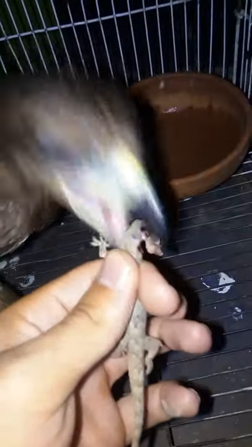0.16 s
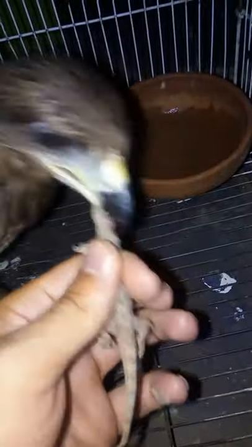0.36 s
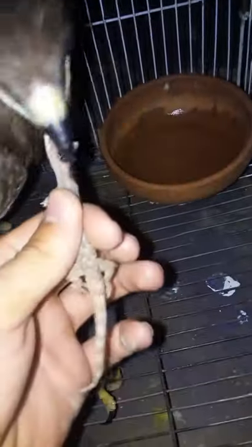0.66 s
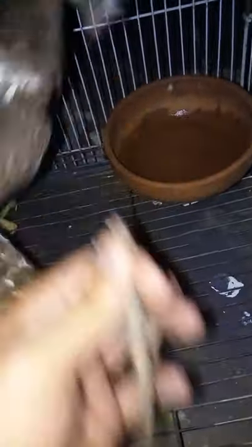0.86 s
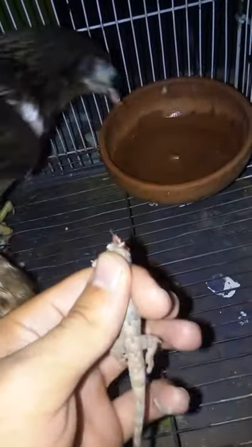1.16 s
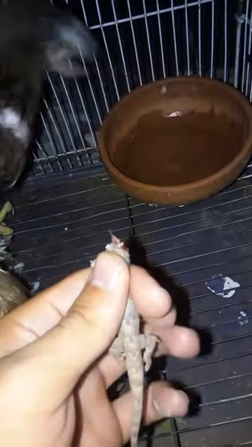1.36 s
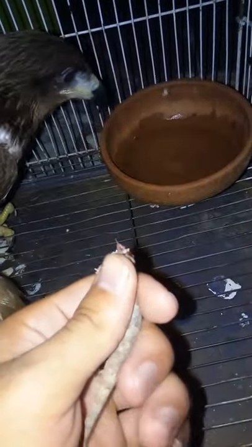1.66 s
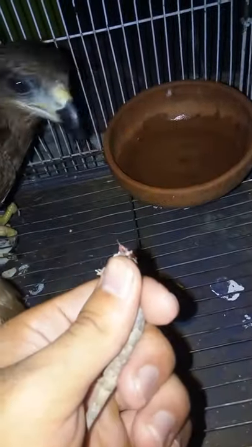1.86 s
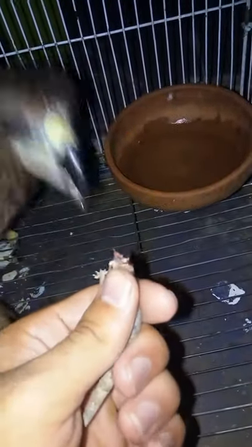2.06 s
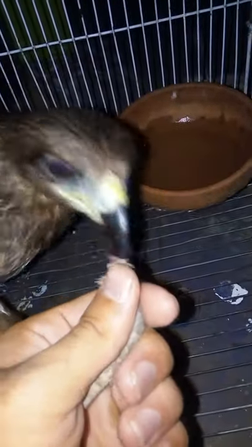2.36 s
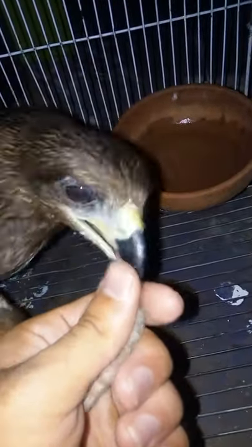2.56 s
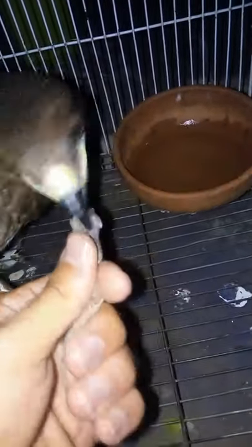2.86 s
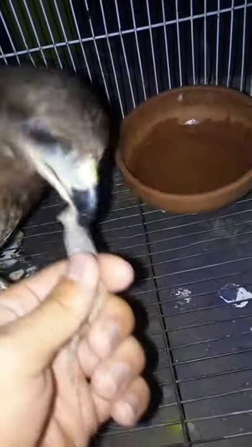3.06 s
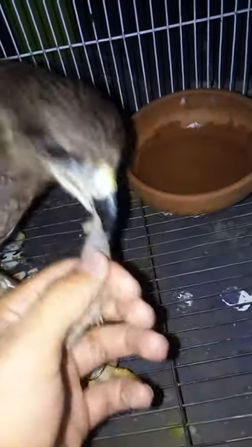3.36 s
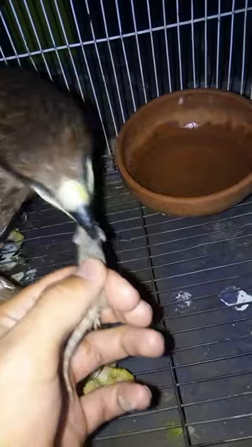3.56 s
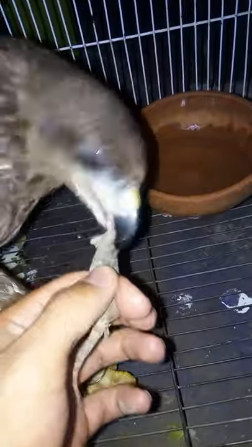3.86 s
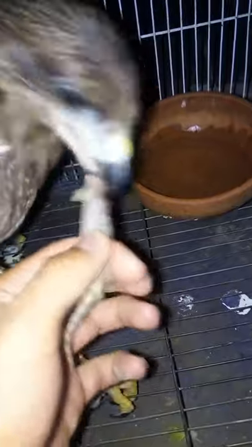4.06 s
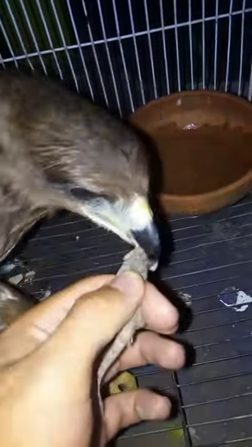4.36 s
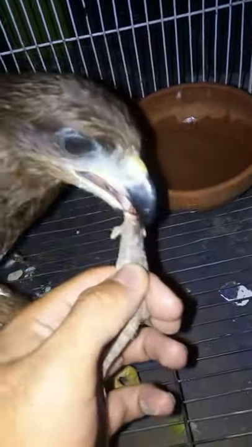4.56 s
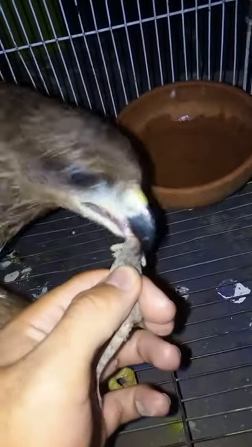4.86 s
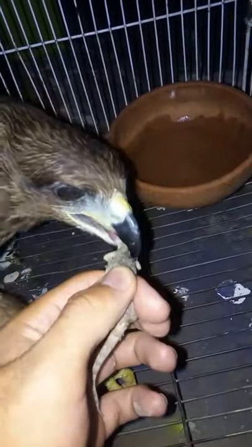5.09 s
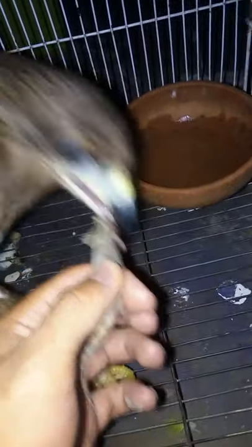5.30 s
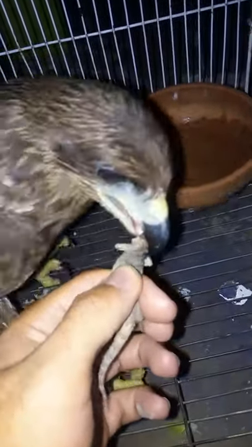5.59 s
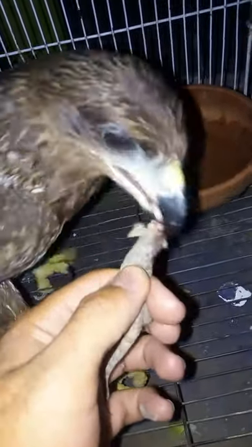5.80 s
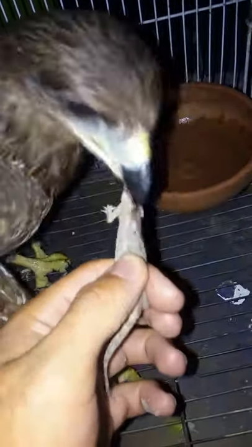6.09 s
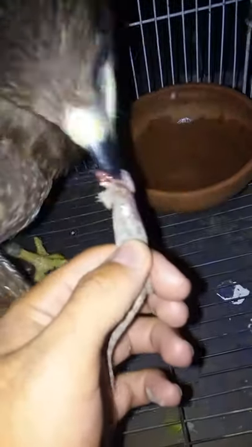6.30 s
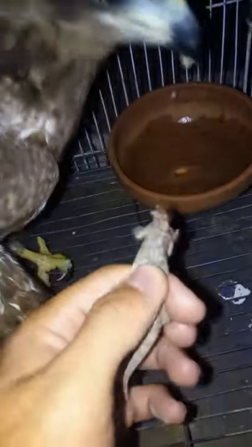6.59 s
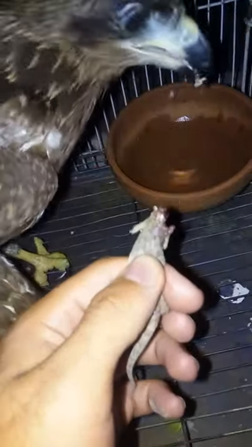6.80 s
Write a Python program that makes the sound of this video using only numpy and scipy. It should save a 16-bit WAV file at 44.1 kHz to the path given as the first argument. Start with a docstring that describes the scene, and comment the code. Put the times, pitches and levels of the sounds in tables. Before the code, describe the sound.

Night in a small hard cage, picked up close in stereo: a distant bass hum swells and sinks beneath steady insect hiss near 7 kHz. A clipped bird chirp is already sounding at 0 s. From 0.2 to 1.5 s, crisp beak and claw ticks cluster with soft grainy feather rustles; faint cricket pips ring at left from 1.0 to 1.8 s. A stronger rustle at 1.9 s meets a weak chirp, tiny quill squeaks and a faint low ring, then a louder, very short chirp at 2.36 s. Ticks continue to 3.2 s; dull tray knocks come at 3.5, 3.8 and 4.0 s. From 4.4 to 5.6 s a loud piercing whistle wavers around 2.1 kHz, jumps higher near 5.35 s and cracks into a rasp. Clearer cricket pips, a rustle and a knock follow; a low shaky cluck at 6.0 s and last ticks until 6.6 s end it.

```python
"""A caged bird of prey, fed by hand at night: two microphone ports hear it close by in a small hard space.
Hum and insect chorus, shaped noise, lie under it all. A chirp of stacked partials opens; noise-burst ticks
of beak and claws and grainy feather rustles follow, a cricket's ringing pips, then two more chirps. Damped
modes knock in the floor tray, one long wavering whistle cracks into a rasp near its end, pips return and a
low shaky cluck and last ticks follow. Gain control ducks the background under loud sounds."""
import sys
import numpy as np
from scipy import signal
from scipy.fft import rfft, irfft
from scipy.io import wavfile
from scipy.ndimage import uniform_filter1d, minimum_filter1d

SR = 44100
rng = np.random.default_rng(int(sys.argv[2]) if len(sys.argv) > 2 else 0)


def bounce(signal):
    """Save signal as a 16-bit WAV file at the path given by the first command-line argument."""
    frames = np.transpose(np.atleast_2d(signal))
    limited = np.clip(frames, -1, 1)
    pcm = np.round(limited * 32767).astype(np.int16)
    wavfile.write(sys.argv[1], SR, pcm)


N = 306054
LEAD_S = 0.035  # the first call is already sounding this long


def gain_of(db):
    """Decibels to amplitude gain."""
    return 10 ** (np.asarray(db) / 20)


def evened(x):
    """Scales a sound to rms 1."""
    return x / np.sqrt(np.mean(x ** 2) + 1e-20)


def read(points, hz):
    """Reads a curve of (f/Hz, value) on a log-frequency axis."""
    f, value = np.transpose(points)
    return np.interp(np.log(hz + 1), np.log(f + 1), value)


def sides(pan_db):
    """Gains of the left and right port for a left minus right level."""
    return gain_of(np.multiply.outer([0.5, -0.5], pan_db))


def wander(length, span):
    """Random drift for two sides, smoothed over span samples, rms 1."""
    return evened(uniform_filter1d(rng.standard_normal((2, length)), span))


def coloured(x, points, tilt_db=0):
    """Shapes both channels by a spectrum tilted in dB per octave about 8 kHz, rms 1."""
    hz = np.fft.rfftfreq(x.shape[1], 1 / SR)
    octaves = np.log2(hz / 8000 + 0.0011)
    shaped = rfft(x) * gain_of(read(points, hz) + tilt_db * octaves)
    return evened(irfft(shaped, x.shape[1]))


def add(mix, s, sound):
    """Mixes a two-channel sound in at time s."""
    part = mix[:, round((s + LEAD_S) * SR):][:, :sound.shape[1]]
    part += sound[:, :part.shape[1]]


def air(points, db, patchy_db, swelling):
    """Far noise: random short-time spectra with drifting patches, likeness of the sides set by frequency."""
    # swell of the low hum: t/s, level/dB
    hum_swell = [(0, 4), (.6, 2.5), (.9, -6), (1.6, 4.5), (2.3, 0), (3, 2.5), (3.6, 0.8), (4.3, -2.5),
                 (5.2, 3), (5.8, 0), (6.4, 6), (6.94, -2)]
    # lift of the background's upper part that offsets the gain control's ducking:
    # t/s, level/dB, half width/s
    background_lift = [(3.6, 2.5, 0.34), (5.5, 10.5, 0.42)]
    # likeness of the two ports: f/Hz, likeness (share)
    likeness = [(60, 1), (180, 0.93), (550, 0.68), (1650, -0.2), (4970, -0.0087), (15000, -0.21)]
    # lean of the far sound: f/Hz, left minus right level/dB
    far_lean = [(60, -1), (180, -3.5), (550, -0.5), (1650, -3.5), (4970, -4.5), (15000, 2.5)]
    upper_share = 0.058  # how much of the swell the upper part follows
    frames, hz = N // 256 + 5, np.fft.rfftfreq(1024, 1 / SR)
    a, b, c, d, patches = rng.standard_normal((frames, 513, 5)).T
    patches = evened(uniform_filter1d(uniform_filter1d(patches, 12, 0), 8, 1))
    t = np.arange(frames) * 256 / SR
    low = 1 / (1 + (hz[:, None] / 200) ** 4)
    swell = (low + (1 - low) * upper_share) * np.interp(t, *np.transpose(hum_swell))
    lift = sum(up * np.maximum(1 - abs(t - at) / width, 0) for at, up, width in background_lift)
    swell = swell + (1 - low) * lift
    same = np.clip(read(likeness, hz), -1, 1)[:, None]
    left = a + 1j * b
    right = same * left + np.sqrt(1 - same ** 2) * (c + 1j * d)
    z = np.array([left, right])
    z *= gain_of(patchy_db * patches + swell * swelling) * sides(read(far_lean, hz))[:, :, None]
    noise = signal.istft(z, nperseg=1024, noverlap=768)[1][:, :N]
    return gain_of(db) * coloured(noise, points)


def hum():
    """A distant low hum: swelling noise with most of its power in the bass."""
    # spectrum: f/Hz, relative level/dB
    hum_spectrum = [(20, -15.5), (50, -40), (72, -13.5), (92, -2), (119, 1), (140, -10.5), (163, -5),
                    (210, -15), (290, -12), (420, -17), (620, -22.5), (1000, -23), (1600, -33.5),
                    (2500, -46.5)]
    return air(hum_spectrum, -28.5, patchy_db=1.79, swelling=True)


def insect_chorus():
    """Hiss and the insect chorus: steady patchy noise with a peak near 7 kHz."""
    # spectrum with the chorus peak: f/Hz, relative level/dB
    hiss_spectrum = [(800, -29.5), (1800, -9), (3800, -16.5), (5900, -16), (6600, -2.5), (7090, 5.5),
                     (7700, -7), (8400, -30), (10300, -17), (12000, -81), (13300, -53), (14800, -16),
                     (15600, -40), (16500, -34)]
    return air(hiss_spectrum, -33, patchy_db=2.0, swelling=False)


def room(x):
    """Sparse random-sign echoes, different at each port; each band dies at its own speed."""
    # decay of the small space: f/Hz, t60/s
    decay = [(1000, .25), (2200, 0.31), (4400, 0.27), (8000, 0.28), (16000, 0.038)]
    taps = np.zeros((2, SR // 2))
    at = np.arange(200, SR // 2 - 20, 20) + rng.integers(0, 20, (2, (SR // 2 - 201) // 20))
    np.put_along_axis(taps, at, rng.choice([-1., 1.], at.shape), 1)
    hz, t, z = signal.stft(taps, SR, nperseg=256)
    fading = gain_of(-60 * t / np.abs(read(decay, hz))[:, None])
    tail = signal.istft(z * fading, SR, nperseg=256)[1]
    return signal.fftconvolve(x, tail / np.linalg.norm(tail[0]), axes=1)[:, :x.shape[1]]


def pip(s, db):
    """One wing stroke rings the cricket's harp, a damped tone to the left."""
    pip_hz, t60, pan_db = 3776, 0.037, 10
    t = np.arange(1500) / SR
    ring = np.sin(2 * np.pi * pip_hz * t) * np.minimum(t / 0.0004, gain_of(-60 * t / t60))
    return s, gain_of(db) * np.outer(sides(pan_db), ring)


def knock(s, db, pan_db):
    """A dull blow rings the damped modes of the cage's floor tray."""
    # modes: f/Hz, relative level/dB, t60/s
    tray = [(334, 5, .08), (515, 8, 0.035), (787, 3.5, 0.06), (1160, 5, .025), (1820, 9, 0.012),
            (2400, 4, 0.015)]
    t = np.arange(3000) / SR
    ring = sum(gain_of(level - 60 * t / t60) * np.sin(2 * np.pi * hz * t) for hz, level, t60 in tray)
    return s, gain_of(db) * np.outer(sides(pan_db), ring / abs(ring).max())


def low_tone(s, hz, db, t60):
    """A faint tone of wavering pitch and level that swells quickly and dies slowly."""
    t = np.arange(0, 0.5, 1 / SR)
    turns = np.cumsum(hz * (1 + 0.025 * wander(len(t), 500)[0])) / SR
    fall = gain_of(-60 * t / t60 + 3.5 * wander(len(t), 600)[0])
    tone = np.minimum(t / 0.03, fall) * np.sin(2 * np.pi * turns)
    return s, gain_of(db) * np.array([tone] * 2)


def squeak(s, length, hz, db):
    """Rubbing quills: a short thin tone, stronger on the left."""
    t = np.arange(0, length, 1 / SR)
    return s, gain_of(db) * np.outer(sides(6.), np.sin(2 * np.pi * hz * t) * np.hanning(len(t)))


def rustle(s, t60, db, tilt_db, pan_db):
    """Feather barbs slip in uneven grains of noise that swell and die away."""
    # spectrum of the barbs: f/Hz, relative level/dB
    feather = [(1500, -30), (3500, -2), (6000, 5.5), (10000, 5), (12500, 4.5), (13500, -13), (15000, 15),
               (16500, -19)]
    rise_share, sharp_db = 0.084, -23.5  # rise as a share of the fall; above sharp_db it starts almost at once
    rise = 0.002 + rise_share * t60 / (1 + gain_of(4.7 * (db - sharp_db)))
    t = np.arange(0, rise + t60, 1 / SR)
    grains = gain_of(2.4 * evened(uniform_filter1d(rng.standard_normal(len(t)), 60)))
    shape = np.minimum(t / rise, gain_of(-60 * (t - rise) / t60))
    barbs = coloured(rng.standard_normal((2, len(t))), feather, tilt_db)
    return s, gain_of(db) * sides(pan_db)[:, None] * shape * grains * barbs


def tick(s, db, pan_db, tilt_db):
    """Beak or claw: a crack of a millisecond or two with a short bright ring."""
    # spectrum of the snap: f/Hz, relative level/dB
    snap_spectrum = [(1200, -16), (3000, -9.5), (6000, -1), (10000, 2), (12500, -12), (14500, -6),
                     (16500, -16)]
    ring_hz, spread = 10020, 0.07  # ring and its scatter as a share
    t = np.arange(500) / SR
    snap = coloured(rng.standard_normal((2, 500)), snap_spectrum, tilt_db) * gain_of(-60 * t / 0.015)
    ring = np.sin(2 * np.pi * ring_hz * (1 + spread * rng.standard_normal()) * t)
    ring = ring * gain_of(-60 * t / 0.0032)
    onset = np.minimum(t / 0.00015, 1)
    return s, gain_of(db) * sides(pan_db)[:, None] * (1.09 * snap + 0.7 * ring) * onset


def faint_ticks():
    """Twelve small ticks at random times, as rows of t/s, level/dB, pan/dB, tilt/dB per octave."""
    when, size = rng.random((12, 2)).T
    return [(s * (N / SR - 0.1), -40 + 6 * up, 9, -3) for s, up in zip(when, size)]


def cluck(s, length, first_hz, last_hz, db, tilt_db):
    """A low, short, shaky stack of partials coloured by the throat."""
    # what the throat lets through: f/Hz, level/dB
    throat = [(700, -13), (1400, -6), (2000, -2.5), (2750, -0.5), (3400, -11), (4000, -4), (4700, -17),
              (6000, -17)]
    shake, rough_db = 0.013, 3  # wobble of pitch (share) and of each partial's level
    smear = 0.06  # the throat delays higher partials, radians per squared multiple
    port_lag_s = 0.00022  # arrival at the right port after the left
    t = np.arange(0, length, 1 / SR)
    hz = np.linspace(first_hz, last_hz, len(t)) * (1 + shake * wander(len(t), 150)[0])
    turns = np.cumsum(hz) / SR - np.c_[[0, port_lag_s * first_hz]]
    stack = 0
    for k in range(1, 10):
        level_db = read(throat, k * hz) + tilt_db * np.log2(k) + rough_db * wander(len(t), 200)[0]
        stack = stack + gain_of(level_db) * np.cos(2 * np.pi * k * turns - smear * k ** 2)
    shape = np.sin(np.pi * t / length) ** 2
    return s, gain_of(db) * evened(stack) * sides(3.5)[:, None] * shape


def crack(s, length, db):
    """Chaotic cycles at the whistle's top: a dense burst of noise over the partials."""
    # spectrum of the rasp: f/Hz, relative level/dB
    rasp_spectrum = [(1800, -30), (2600, -4), (3300, 0), (4200, -5), (6000, -10), (8000, -17), (11000, -19),
                     (12000, -40)]
    count = round(length * SR)
    noise = coloured(rng.standard_normal((2, count)), rasp_spectrum)
    return s, gain_of(db) * noise * sides(2.5)[:, None] * np.hanning(count)


def call(pitch, voice, pose):
    """A whistled stack of partials through the windpipe; each partial leans left or right."""
    # what windpipe and cage let through of partials 1 to 4: f/Hz, level/dB
    tract = [(1900, -11), (2100, -7.5), (2230, -5), (2480, -3.5), (3900, -1), (4300, 3), (4950, 1.5),
             (5200, -12), (5900, -13.5), (6400, -13.5), (6700, -23.5), (7400, -31), (8000, -27.5),
             (8600, -22.5), (9800, -21.5)]
    # partials 5 to 7: f/Hz, level/dB
    upper = [(9500, 1.5), (11500, -3), (13300, -11), (15000, 4), (15800, 8), (16700, -25)]
    # lean of the first partial: f/Hz, left minus right level/dB
    ground_lean = [(1900, 5), (2050, 4), (2200, 16), (2330, 5.5), (2480, -3.5), (2600, -2)]
    # added lag of the first partial at the right port: f/Hz, lag/ms
    ground_lag = [(1900, 0.03), (2100, .01), (2230, 0.057), (2350, 0.21), (2550, 0.28)]
    # spectrum of the hoarseness: f/Hz, relative level/dB
    hoarse_spectrum = [(900, -29), (1200, -8), (2500, -20), (3300, -1), (4200, -12), (5500, -2), (8000, -6),
                       (11000, -1.5), (12500, -51)]
    # hoarse moments: t/s, level/dB, fall to either side/dB per s
    hoarse_spells = [(0.0, -21, 1500), (1.965, -32, 510), (2.358, -54, 600), (4.418, -18.5, 400),
                     (4.47, -41, 300), (4.785, -42, 700), (4.9, -46, 800), (4.98, -21, 500),
                     (5.45, -16.5, 250)]
    flutter_db, upper_lag_ms = 0.21, 0.0084  # unsteadiness of each partial; added lag of partials 5 to 7
    s, *columns = np.transpose(voice)
    t = np.arange(s[0] if s[0] > LEAD_S else -LEAD_S, s[-1], 1 / SR)
    effort, ground_db, beak, second_lean = (np.interp(t, s, c) for c in columns)
    upper_db, tilt_db, lean_db, ground_ms, lag_ms = pose
    hz = uniform_filter1d(np.interp(t, *np.transpose(pitch)), 200)
    hz = hz * (1 + 0.0023 * wander(len(t), 300)[0])

    # phases in cycles; only the right port lags
    right_s = [0, 1e-3]  # seconds per millisecond of lag
    turns = np.cumsum(hz) / SR - np.outer(right_s, hz * lag_ms)
    ground = turns[0] - np.outer(right_s, hz * (ground_ms + read(ground_lag, hz)))
    late = np.outer(right_s, hz * upper_lag_ms)

    # each partial: multiple, level/dB, left minus right level/dB
    stack = [(1, ground_db + read(tract, hz), lean_db + read(ground_lean, hz)),
             (2, read(tract, 2 * hz), second_lean),
             (3, beak + read(tract, 3 * hz), 4.2),
             (4, beak + read(tract, 4 * hz), 13.0)]
    for step, k in enumerate(range(5, 8)):
        stack.append((k, upper_db + tilt_db * step + beak + read(upper, k * hz), 13.0))
    tone = 0
    for k, db, pan in stack:
        lean = sides(pan * np.ones(len(t)))
        lean = lean / np.sqrt((lean ** 2).mean(0))  # leaning keeps the power
        level = np.sqrt(2) * gain_of(effort + db + flutter_db * wander(len(t), 400))
        cycles = ground if k == 1 else k * turns - late * (k > 4) * k
        tone = tone + level * lean * np.cos(2 * np.pi * cycles)

    # uneven strong-weak cycles put shaky lines half-way between the partials, in breath noise
    halves = sum(wander(len(t), 280) * np.cos(np.pi * k * turns) for k in range(1, 10, 2))
    breath = rng.standard_normal((2, len(t)))
    rasp = coloured(gain_of(1.5) * evened(halves) + breath, hoarse_spectrum)
    hoarse = sum(gain_of(db - fall * abs(t - at)) for at, db, fall in hoarse_spells)
    edge = np.clip(np.minimum(t - t[0], s[-1] - t) / 0.0027, 0, 1)
    return t[0], (tone + hoarse * rasp) * edge


def scene():
    """All near sources excite the room; hum and insect chorus lie under them at a distance."""
    # cricket: t/s, level/dB
    pip_rows = [(1.0156, -32), (1.1004, -28.5), (1.1822, -41), (1.4321, -34), (1.6536, -27), (1.737, -27.5),
                (1.8163, -37), (5.5059, -15), (5.681, -22.5), (5.7723, -26), (5.8395, -32.5), (5.9244, -38)]
    # cage floor: t/s, level/dB, left minus right level/dB
    knock_rows = [(3.464, -18, -6), (3.807, -22, -7), (3.997, -21, -8), (5.75, -23, -3.5)]
    # faint ring after the loudest rustle: f/Hz, level/dB, t60/s
    ring_after = (790, -29, 0.72)
    # quills: t/s, length/s, f/Hz, level/dB
    squeak_rows = [(2.065, 0.011, 9400, -35), (2.081, 0.012, 9740, -26), (2.091, .007, 12300, -35),
                   (2.102, 0.01, 8570, -25.5)]
    # feathers: t/s, fall t60/s, level/dB, tilt/dB per octave, left minus right level/dB
    rustle_rows = [(.5, .18, -33, -6, 6), (0.69, 0.15, -41, -2, 9), (.998, 0.47, -28, -5.5, -2.5),
                   (1.288, 0.24, -33.5, -7, -2), (1.871, 0.2, -18.5, -3, 0), (2.069, 0.31, -31, -3.5, 2),
                   (2.478, 0.12, -33.5, 6, 8), (2.651, 0.29, -40, -6, 3), (3.519, 0.18, -41, -5, 6),
                   (3.67, 0.23, -43, -2, 3), (4.041, 0.21, -41, -6.5, 8), (4.365, .05, -40, -6.5, 14),
                   (5.578, 0.6, -32.5, -6, -1), (6.13, 0.43, -53, 8, 9), (6.599, .24, -41, -4, 5)]
    # beak and claws: t/s, level/dB, left minus right level/dB, tilt/dB per octave
    tick_rows = [(0.187, -29.5, 11, 12), (0.5247, -24, 14, -1.5), (0.563, -28, 6, 0), (0.7134, -31, 7, 2),
                 (0.7257, -28, 12, -3.5), (0.8265, -29.5, 9, 5), (0.847, -19, 8, 4), (0.867, -18, 7, 10),
                 (0.9472, -26.5, -6, -3), (1.073, -16.5, -1, -2.5), (1.2974, -37, .5, -11),
                 (1.4316, -32, -1, -11), (2.2276, -19.5, 7, -3.5), (2.2497, -19.5, 4, -3),
                 (2.509, -28, 5, 5), (2.6562, -22.5, 10, 0), (2.6804, -21.5, 1, -2), (2.9856, -35, 11, -3),
                 (3.0949, -29, 9, 0), (3.1836, -17, 12, 12), (3.1883, -22, 10, 10), (4.0593, -26, 13, -5),
                 (6.1367, -25, 11, 2), (6.185, -36, 10, -1), (6.4679, -23.5, 9, -2), (6.51, -22, 9, 2.5),
                 (6.604, -17.5, -4, -2)]
    # the cluck's overlapping voices: t/s, length/s, first f/Hz, last f/Hz, level/dB, tilt/dB per octave
    cluck_rows = [(6.001, .027, 657, 734, -11, -5.5), (6.007, 0.067, 700, 742, -21.5, -17),
                  (6.024, 0.034, 685, 646, -12.5, 1)]
    # the whistle cracks into a rasp: t/s, length/s, level/dB
    crack_row = (5.385, .1, -14)
    # one table a call: t/s, pitch f/Hz
    call_pitch = [
        [(0.002, 1905), (0.008, 1926), (0.013, 2274), (0.056, 2224)],
        [(1.914, 1850), (1.932, 1913), (1.946, 2070), (1.952, 1972), (1.984, 2063), (1.988, 2253),
         (2.042, 2008)],
        [(2.356, 1940), (2.392, 2123), (2.406, 2129), (2.422, 2078), (2.436, 1880)],
        [(4.394, 1950), (4.412, 2124), (4.432, 2193), (4.478, 2067), (4.498, 2080), (4.536, 1918),
         (4.582, 2068), (4.626, 1952), (4.682, 2115), (4.76, 2217), (4.82, 2198), (4.874, 2126), (4.988, 2230),
         (5.056, 2124), (5.228, 2162), (5.254, 2093), (5.294, 2242), (5.318, 2205), (5.332, 2265),
         (5.356, 2482), (5.404, 2494), (5.432, 2627), (5.458, 2418), (5.476, 2417), (5.488, 2471),
         (5.508, 2400), (5.528, 2330), (5.545, 2342), (5.563, 2370), (5.582, 2140)],
    ]
    # one table a call: t/s, effort level/dB, extra level of the first partial/dB,
    # beak opening as lift of the higher partials/dB, second partial's left minus right level/dB
    call_voice = [
        [(0.002, -26.5, 26, 4, 13), (0.011, -24, 24, 7, -2), (0.018, -12, 13, 13, 3),
         (0.049, -17.5, 13.5, 13.5, -4), (0.056, -34, 23, -2, 0)],
        [(1.914, -35, 30.5, 25, 5), (1.936, -11, 2, -11, -6), (1.962, -8.5, 14.5, 7.5, -6),
         (1.98, -22, 23.5, 9, 5), (1.99, -31, 20, 8, 0), (2.042, -34, 14, 2, 4)],
        [(2.356, -3, 11, -26, -2), (2.361, -1.5, 3, 1.5, 5.5), (2.418, -3.5, 6.5, -4.5, -6.5),
         (2.436, -20.5, 22.5, 1, 2)],
        [(4.394, 0, 4, -20, -4), (4.399, -6, 4, -3, 4), (4.414, 1, 1, -2, 6), (4.43, -9.5, 1, 4.5, 5),
         (4.468, 2.5, 1.5, -1, 6), (4.53, -2, 0, -3, 3), (4.624, 0.5, 1, -9.5, 1), (4.784, 0.5, 1.5, -5, -12),
         (4.918, 1, -1.5, -4, 5), (4.986, -7, 9, 12, 8), (5.046, 3.5, -1, 6.5, 13), (5.224, 5.5, -8.5, 4.5, 10),
         (5.254, 4, -13, -3, 1), (5.292, -1.5, 5.5, -1, 10), (5.322, 0, 7.5, 8, 4), (5.342, 4.5, -2, -3, 3),
         (5.376, 6.5, 3.5, -2, 19), (5.446, 0, 8, 11.5, 8), (5.5, 4.5, 6.5, 2, -5), (5.53, -9, 6.5, -4, -4),
         (5.566, -7, 5.5, 4.5, -5), (5.584, -13.5, 5, 2, 8)],
    ]
    # one row a call: upper partials level/dB, their tilt/dB per partial, lean of the first partial/dB,
    # base lag at the right port of the first partial/ms, lag of the others/ms
    call_pose = [(-46, -6, -12, 0.043, 0.19), (-38, -4, -9.5, 0.3, 0.286), (-24, -7, 0.5, .17, .14),
                 (-32.5, 0, -0.5, 0.26, .16)]
    lead = round(LEAD_S * SR)
    near = np.zeros((2, N + lead))
    for tables in zip(call_pitch, call_voice, call_pose):
        add(near, *call(*tables))
    sources = ((pip, pip_rows), (knock, knock_rows), (low_tone, [(1.885, *ring_after)]),
               (squeak, squeak_rows), (rustle, rustle_rows), (tick, [*tick_rows, *faint_ticks()]),
               (cluck, cluck_rows), (crack, [crack_row]))
    for source, rows in sources:
        for row in rows:
            add(near, *source(*row))
    night = hum() + insect_chorus()
    return (near + gain_of(-16.5) * room(near))[:, lead:] + night


def record(dry):
    """Gain control that looks a few milliseconds ahead and recovers fast, a peak limiter, then the band limit."""
    threshold_db, share = -28.5, 0.38  # share of the excess that is taken away
    ceiling, edge_hz = 0.82, 16700  # limiter's highest sample before the band limit; band limit
    power_db = 10 * np.log10(abs(uniform_filter1d((dry ** 2).mean(0), 300)) + 1e-12)
    fall = np.arange(N) * 290.0 / SR  # the held level falls 290 dB a second
    held_db = np.maximum.accumulate(power_db + fall) - fall
    over_db = np.maximum(held_db - threshold_db, 0)
    ahead_db = -minimum_filter1d(-over_db, size=400)
    ducked = dry / gain_of(share * uniform_filter1d(ahead_db, 400))
    limit = np.minimum(ceiling / (abs(ducked).max(0) + 1e-9), 1)
    limited = ducked * uniform_filter1d(minimum_filter1d(limit, size=400), size=300)
    lowpass = signal.firwin(511, edge_hz, window=("kaiser", 9), fs=SR)
    return signal.oaconvolve(limited, lowpass[None], "same")


dry = scene()
out = record(dry)
bounce(out)
```